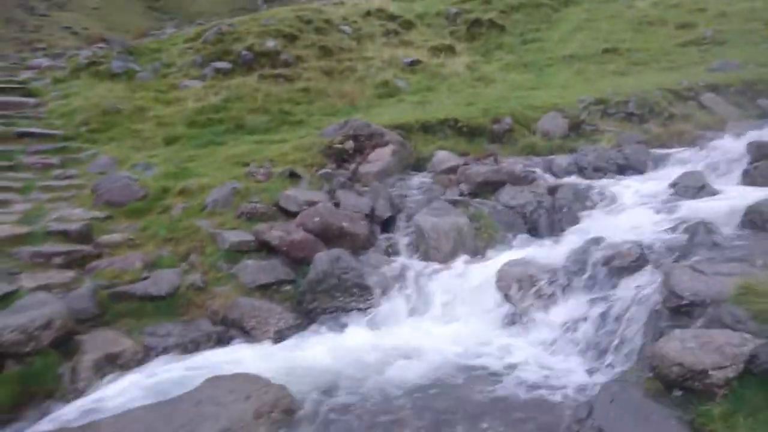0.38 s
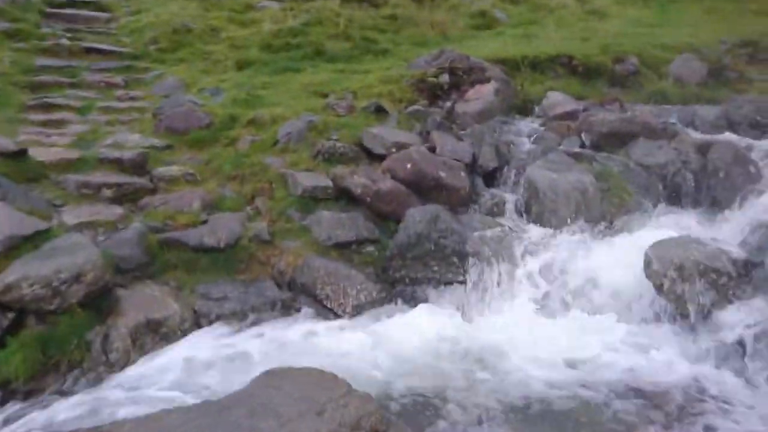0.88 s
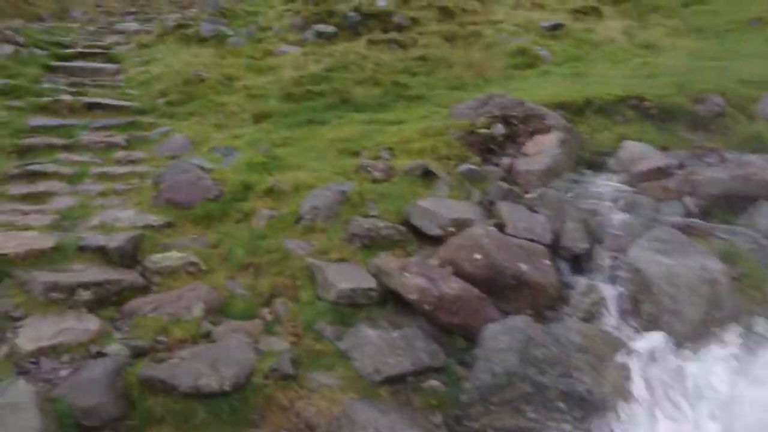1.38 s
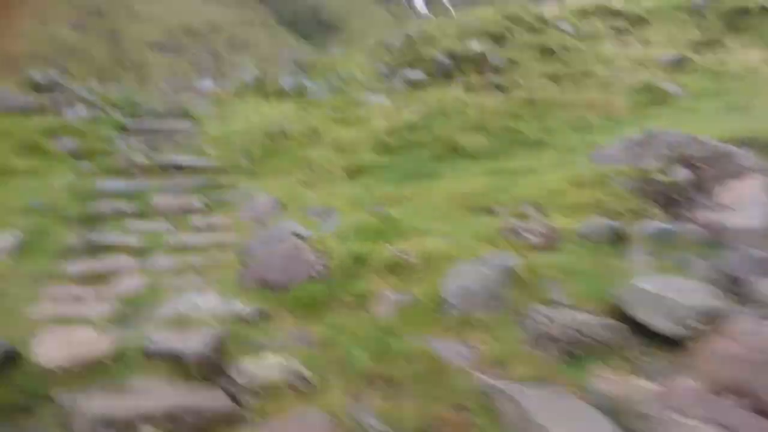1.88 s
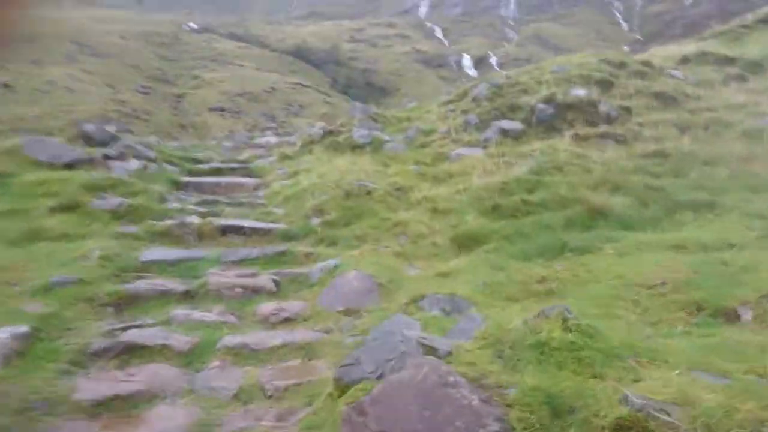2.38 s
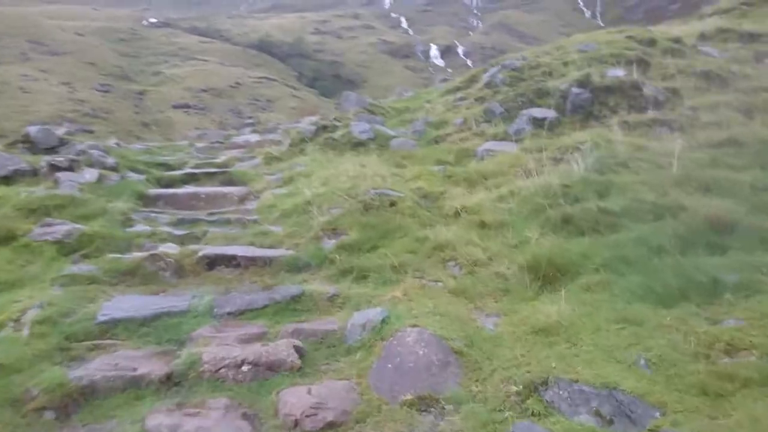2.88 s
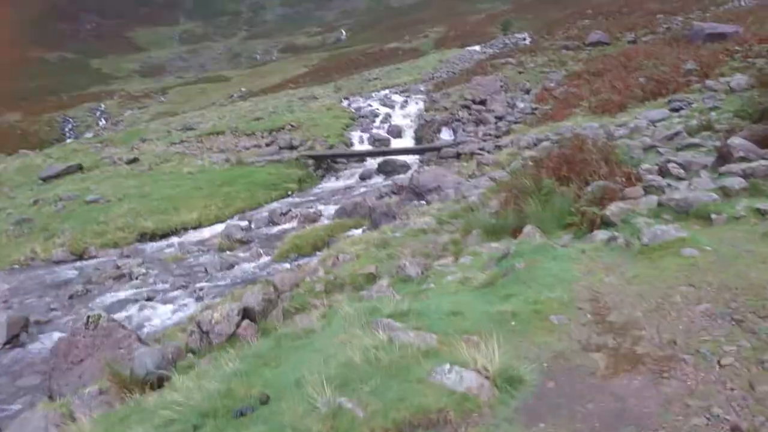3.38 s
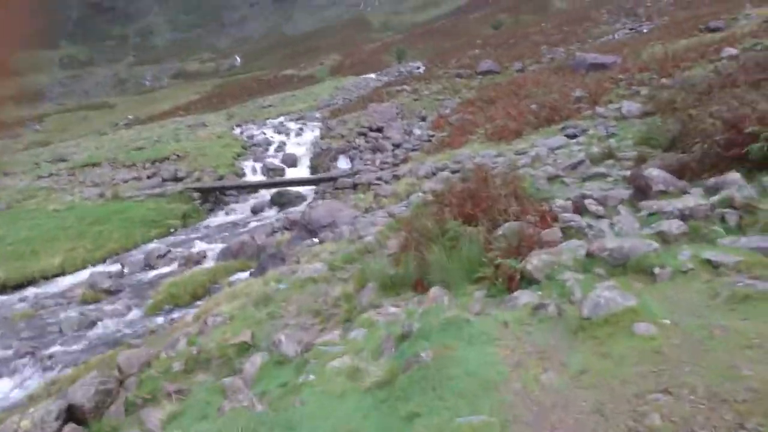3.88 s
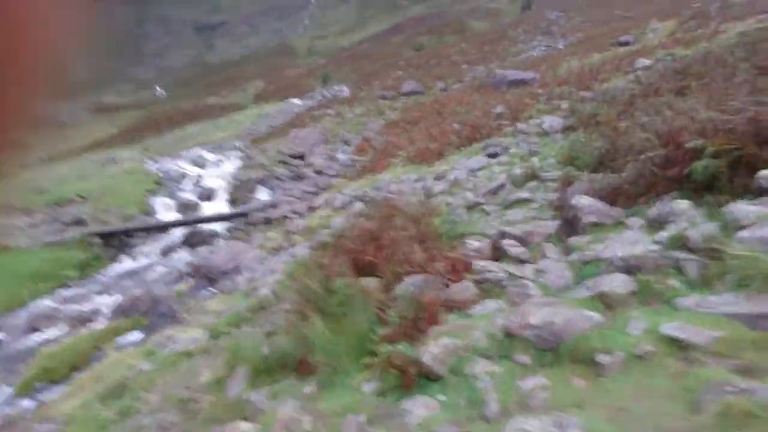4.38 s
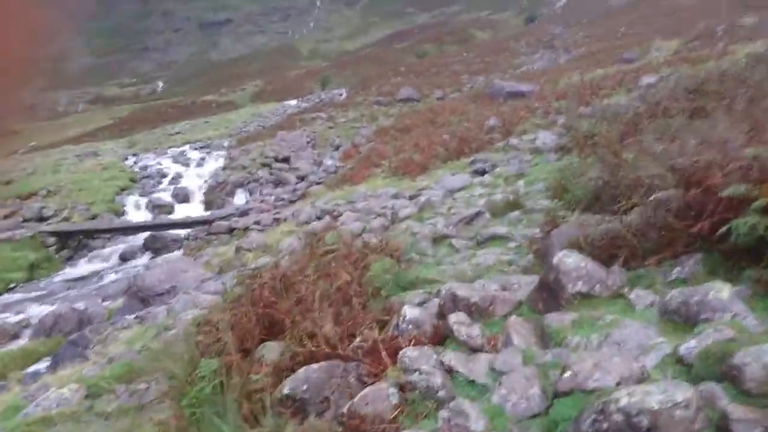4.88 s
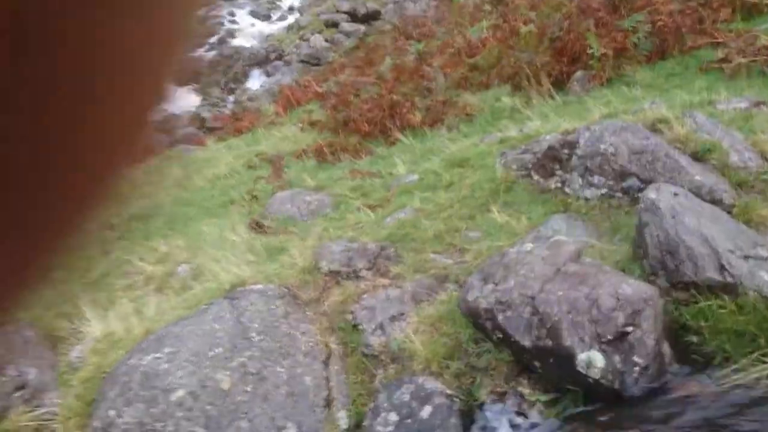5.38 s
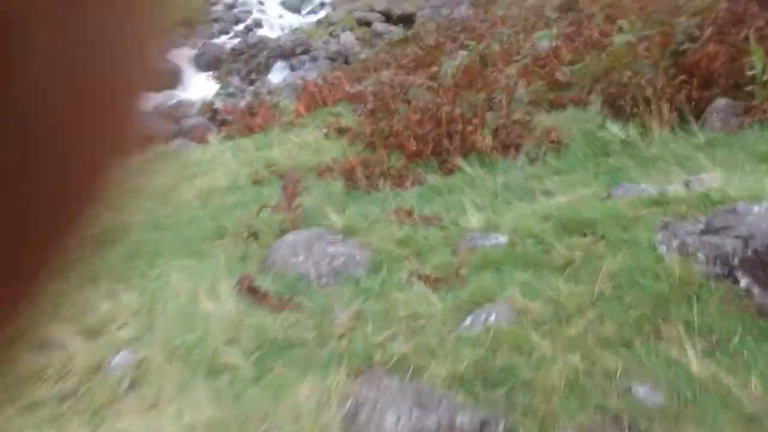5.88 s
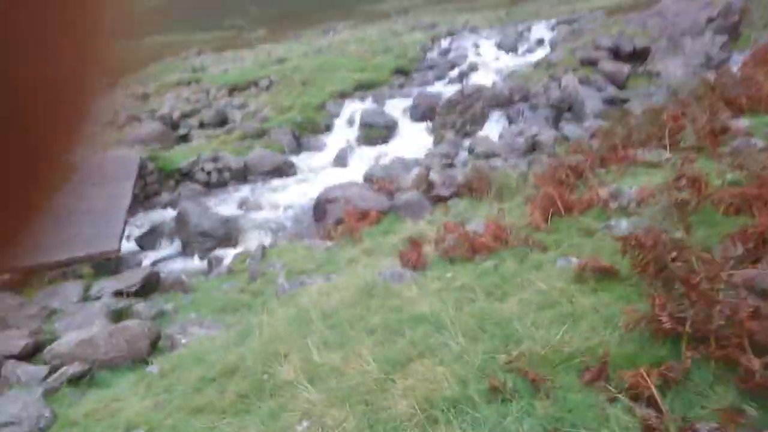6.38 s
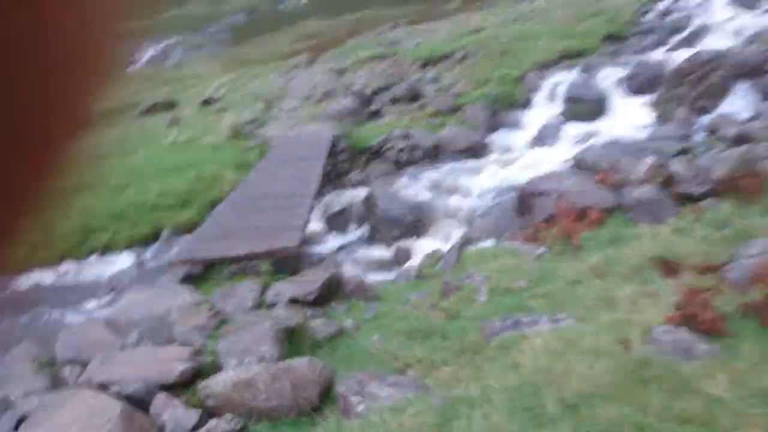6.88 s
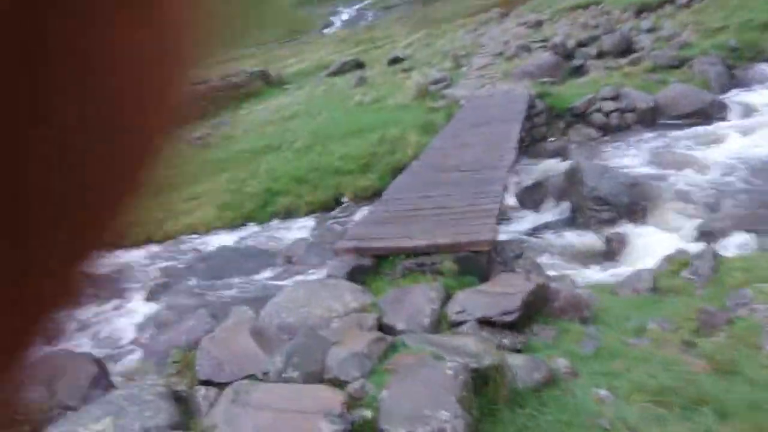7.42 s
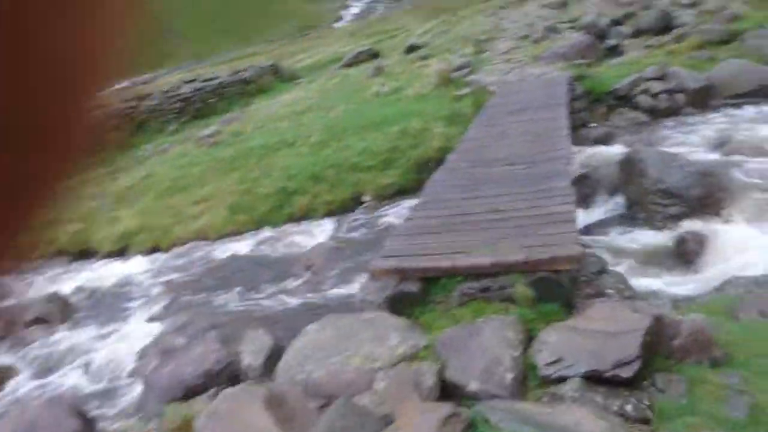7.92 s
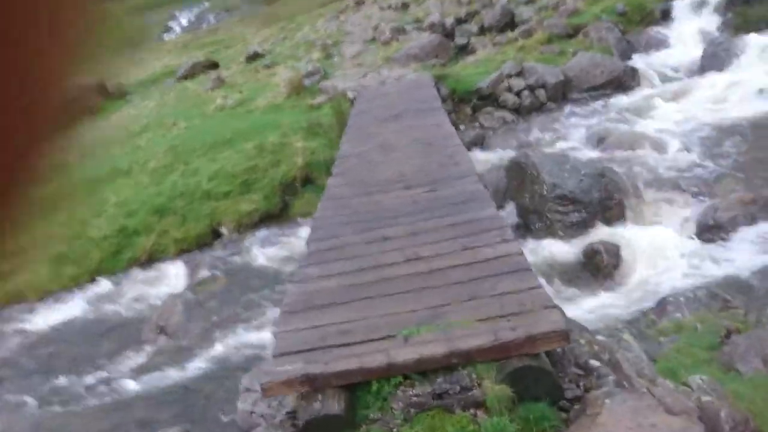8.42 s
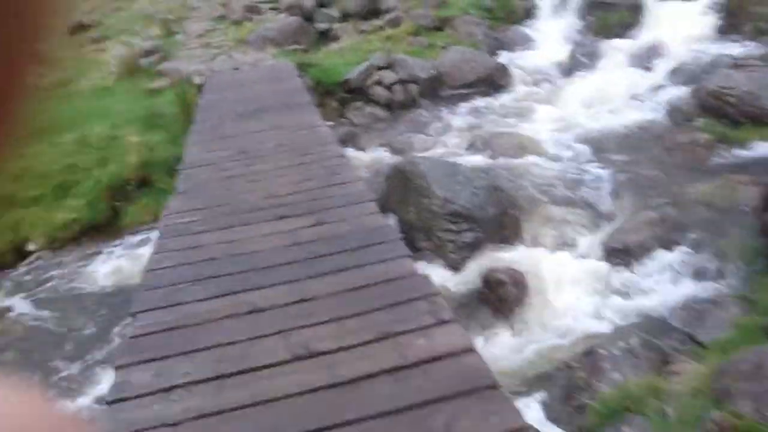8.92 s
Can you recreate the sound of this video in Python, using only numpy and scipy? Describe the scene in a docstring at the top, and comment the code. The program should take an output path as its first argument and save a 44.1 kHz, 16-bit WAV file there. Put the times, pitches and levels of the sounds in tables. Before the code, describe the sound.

Three joined stretches of a rocky hillside stream: first close and bright, then after a short silence clearly quieter, finally stronger and fuller. Low, soft wind thumps and occasional dry ticks hit the handheld microphone. Tiny spray hisses flick on the right, while a partly covered left side sounds dull.

```python
"""Beside a rocky stream: fast water tumbles past, heard from three spots in turn, with quick fades between. The
water is patchy noise and rising bubble rings, split into four bands that swell over time. Wind on the hand-held
microphone is lumpy low noise, with pops as short falling rings; sharp ticks come from knocks on the body of the
recorder. The left port is partly covered: it hears the water muffled, through a small cavity, while the low
pops reach both ports. Short bursts of narrow noise make hisses of spray."""
import sys
import numpy as np
from scipy import signal
from scipy.fft import rfft, irfft, next_fast_len
from scipy.io import wavfile
from scipy.ndimage import uniform_filter1d, map_coordinates

SR = 44100
rng = np.random.default_rng(int(sys.argv[2]) if len(sys.argv) > 2 else 0)


def makeup_ratio(level_db):
    """Linear amplitude ratio for a level in decibels (20 dB per factor of ten)."""
    decades = np.asarray(level_db, float) / 20
    return 10 ** decades


def pcm_store(signal):
    """Save signal as 16-bit PCM."""
    levels = np.round(np.clip(np.atleast_2d(signal), -1, 1) * 32767)
    wavfile.write(sys.argv[1], SR, levels.astype(np.int16).T)


N = 398218  # length in samples


def unit(x):
    """Scale so that the mean of the channels has rms 1."""
    return x / np.sqrt(np.mean(np.atleast_2d(x).mean(axis=0) ** 2) + 1e-20)


def along(points, hz):
    """Read each column after the Hz, on a log frequency axis."""
    point_hz, *columns = np.transpose(points)
    return [np.interp(np.log(hz + 1), np.log(point_hz + 1), column) for column in columns]


def curves(rows, t):
    """Read each column after the time, at times t."""
    row_s, *columns = np.transpose(rows)
    return [np.interp(t, row_s, column) for column in columns]


def wobble(size, rate):
    """A smooth random curve, with rate knots a second."""
    knots = rng.standard_normal(int(size * rate / SR) + 4)
    return map_coordinates(knots, [np.arange(size) * rate / SR])


def filtered(x, response):
    """Multiply the spectrum of x by a response, which may be complex."""
    size = x.shape[-1]
    padded = next_fast_len(size + 8192)
    spectrum = rfft(x, padded) * response(np.fft.rfftfreq(padded, 1 / SR))
    return irfft(spectrum, padded)[..., :size]


def ports(heard, stray, cover):
    """Right hears the sound; left hears it reshaped and phase-shifted, mixed with sound of its own."""
    def left_response(hz):
        db, alike, lag = along(cover, hz)
        alike = np.clip(alike, 0, 1)
        shared = alike * np.exp(-1j * lag)
        own = np.sqrt(1 - alike ** 2)
        return makeup_ratio(db) * np.array([shared, own])
    left = filtered(np.array([heard, stray]), left_response).sum(axis=0)
    return np.array([left, heard])


# Colour of the wind's rumble. Each row: frequency in Hz, relative strength in dB.
RUMBLE_COLOUR = [(13, -49), (22, -23.5), (52, -9.5), (70, 5.5), (190, -3), (257, -8.5), (300, -8),
                 (390, -19.5), (660, -120)]
# Strength of the wind, one list for each spot. Each row: time in seconds, level in dB.
WIND_LEVELS = [
    [(.03, -35), (.48, -39.5), (.81, -31), (1.2, -38), (1.58, -34), (1.8, -37), (2.5, -34.5), (2.8, -39),
     (3.2, -34)],
    [(4.2, -46.5), (4.52, -40), (4.65, -43), (5.0, -38)],
    [(5.3, -27.5), (5.44, -30), (5.56, -39), (5.94, -34.5), (6.1, -37), (6.5, -34.5), (6.96, -39.5),
     (7.3, -32), (7.65, -39), (7.81, -35), (8.28, -38.5), (8.8, -33), (9.0, -37.5)],
]


def wind(place, t):
    """Lumpy gusts rumble on the microphone: low noise that reaches both ports much alike."""
    size = len(t)
    eddies = makeup_ratio(2.1 * wobble(size, rate=18)) * rng.standard_normal((2, size))
    rumble = filtered(eddies, lambda hz: makeup_ratio(along(RUMBLE_COLOUR, hz)[0]))
    # each row: Hz, left against right in dB, likeness 0-1, lag in radians
    both = ports(*rumble, [(60, -5.0, 0.9, .01), (250, -8.0, 0.78, 0.24)])
    return makeup_ratio(curves(WIND_LEVELS[place], t)[0]) * unit(both)


def pop(hz, length, t):
    """A pressure jolt: the capsule rings a few cycles, falling in pitch towards hz."""
    turns = hz * (t + .0035 * (1 - np.exp(-t / .004)))
    onset = 1 - np.exp(-(t / .002) ** 2)
    return -np.sin(2 * np.pi * turns) * onset * np.exp(-(t / length) ** 2)


# Wind pops on the capsule. Each row: start in seconds, strength in dB before onset, decay and port gains,
# the pitch in Hz that the ring falls to, length in seconds.
WIND_POPS = [(0.1014, -19, 81, 0.021), (0.4537, -10.5, 94.5, .018), (0.7041, -20, 92, .017),
             (0.929, -16, 103, .021), (1.178, -8, 96, .017), (1.41, -22, 78, .028),
             (1.506, -12.5, 86.6, .012), (1.988, -22, 73, 0.028), (2.3113, -18.5, 98, .011),
             (2.427, -15, 84, 0.02), (3.1009, -12, 90, 0.024), (3.323, -18, 83, 0.011),
             (3.3395, -21.5, 92, 0.0091), (4.272, -12, 117, .004), (4.4751, -12.5, 150, 0.0048),
             (4.4835, -16, 150, 0.0063), (4.491, -18, 121, 0.009), (4.508, -11.5, 99, .014),
             (4.99, -12, 116, 0.0085), (5.006, -15, 95, 0.022), (5.1005, -24, 88, .024),
             (5.2864, -13, 102, .014), (5.327, -22, 73, .024), (5.363, -20, 104, 0.022),
             (5.9635, -16, 95.5, .027), (6.029, -15.5, 87.5, .019), (6.055, -15.5, 86, 0.014),
             (6.324, -15, 88, .025), (6.621, -22, 92, .032), (6.763, -21, 157, 0.025),
             (6.773, -13, 76.5, 0.022), (6.9683, -22.5, 86, 0.04), (7.1066, -15.5, 107, 0.013),
             (7.645, -17, 72, .03), (8.021, -19, 95, .01)]
# Sharp ticks in the body of the recorder, perhaps a finger shifting.
# Each row: start in seconds, peak in dB before the port gains, pitch in Hz, decay in seconds.
CASE_TICKS = [(0.451, -17, 350, 0.0022), (1.178, -20, 350, .002), (4.229, -27.5, 688, .0015),
              (4.274, -27, 600, .001), (4.477, -18, 610, 0.0017), (4.484, -22, 600, .002),
              (4.492, -20, 605, .002), (4.508, -23, 450, .0015), (4.984, -22, 500, .003),
              (5.966, -10, 600, 0.0014), (6.764, -25, 400, .002), (7.638, -22, 1050, .0012),
              (7.658, -19.5, 432, 0.0091)]


def pops():
    """Single gusts jolt both ports together; ticks travel through the case to both."""
    out, t = np.zeros(N + SR), np.arange(SR // 10) / SR
    for start, db, hz, length in WIND_POPS:
        out[round(start * SR):][:len(t)] += makeup_ratio(db) * pop(hz, length, t)
    for start, db, hz, decay in CASE_TICKS:
        ring = np.sin(2 * np.pi * hz * t) + 0.14 * np.sin(2 * np.pi * 3.2 * hz * t)
        tick = ring * np.exp(-t / decay)
        tick = tick * (1 - np.exp(-(t / 0.00047) ** 2))  # rounded start: little above 3 kHz
        out[round(start * SR):][:len(t)] += makeup_ratio(db) * tick / tick.max()
    return out[:N] * makeup_ratio([[-3], [2]])  # left and right gain in dB


# Short hisses of spray. Each row: start in seconds, level at the swell's top in dB, centre in Hz,
# spread to each side in Hz, rise in seconds.
SPRAY_HISSES = [(.915, -29.5, 9000, 4000, 0.013), (2.667, -29, 9800, 1000, 0.0037),
                (2.676, -32, 9000, 800, 0.0044), (3.003, -36, 9550, 1300, 0.0083),
                (4.243, -43, 11000, 1500, .006), (4.752, -44, 11500, 1200, 0.0067),
                (5.175, -32, 4900, 800, 0.0024), (8.265, -40, 9700, 1200, 0.013)]


def spray():
    """Brief narrow noise that swells and dies away, almost only at the open right port."""
    out, t = np.zeros(N + SR), np.arange(SR // 10) / SR
    for start, db, centre_hz, width_hz, rise in SPRAY_HISSES:
        noise = rng.standard_normal(len(t))
        hiss = filtered(noise, lambda hz: np.exp(-((hz - centre_hz) / width_hz) ** 2))
        swell = (t / rise) * np.exp(1 - t / rise)
        out[round(start * SR):][:len(t)] += makeup_ratio(db) * unit(hiss) * swell
    return out[:N] * makeup_ratio([[-45], [0]])  # left and right gain in dB


def patchy(size, patchy_db):
    """Churning water: white noise with patches of random gain in time and pitch."""
    cells = signal.stft(rng.standard_normal(size + 512), nperseg=512)[2]
    field = uniform_filter1d(rng.standard_normal(cells.shape), size=2, axis=0)
    field = uniform_filter1d(field, size=7, axis=1)
    cells = cells * makeup_ratio(patchy_db * field / field.std())
    return unit(signal.istft(cells, nperseg=512)[1][:size])


def bubbles(size, rate, cycles, spread_db):
    """Bubbles ring briefly and rise in pitch; small ones are high, so the sum is about white."""
    at, pitch, big = rng.random((int(rate * size / SR), 3)).T[:, :, None]
    hz, t = 550 * 14 ** pitch, np.arange(380) / SR
    turns = hz * t
    ring = np.sin(2 * np.pi * turns * (1 + 0.11 * turns / cycles))
    shape = ring * np.exp(-3 * turns / cycles) * (1 - np.exp(-turns))
    grains = hz * makeup_ratio(-spread_db * np.log(1 - big)) * shape
    where = (at * size).astype(int) + np.arange(len(t))
    return unit(np.bincount(where.ravel(), grains.ravel())[:size])


# The flow, one list for each spot. Each row: time in seconds, level of the water's body in dB,
# fizz over body in dB as the microphone turns, left-right balance of the treble in dB
# (only its change from the spot's average is used).
WATER_FLOW = [
    [(0, -29.5, -11, -22), (.3, -30, -9.5, -20), (.75, -28.5, -10, -20), (1.0, -27, -9, -20),
     (1.3, -29, -7.5, -22.5), (1.8, -29.5, -4.5, -27.5), (2.25, -29.5, -5, -29.5),
     (2.5, -30.5, -5.5, -29.5), (2.75, -32.5, -7, -27.5), (3.34, -34, -9.5, -24.5)],
    [(4.01, -38.5, -8.5, -21), (5.17, -39, -8, -20)],
    [(5.25, -30, -8.5, -19), (5.5, -29.5, -9.5, -20), (5.7, -29, -6.5, -18), (5.95, -31, -4, -23),
     (6.3, -34, -8, -27.5), (6.7, -33, -12, -23), (7.1, -34, -13.5, -20.5), (7.7, -33.5, -13.5, -21),
     (8.3, -32, -13.5, -17.5), (8.8, -30.5, -14.5, -19.5), (9.03, -29, -15, -19)],
]
# Each row is a spot: gurgle over body in dB at average fizz, rush over body in dB when fizz equals body.
BAND_LEVELS = [(-2.5, 4), (-2, 6), (-2.5, 5)]
# Edges in Hz between gurgle, body, rush and fizz.
BAND_EDGES_HZ = (700, 1700, 4500)
# Colour of the water at each spot, before its bands are levelled.
# Each row: frequency in Hz, relative strength in dB.
COLOURS = ([(88, -29.5), (160, -6.5), (300, -1.5), (480, 2.5), (740, -5.5), (1050, -3), (1400, -7),
            (1750, -9), (2900, -5), (3700, -11), (6630, -17), (8540, -21.5), (10200, -19.5), (11900, -31),
            (15600, -33.5)], [(88, -19.5), (150, -2), (253, -6), (353, -0.5), (396, -1.5), (798, -5.5),
                             (879, -8), (1110, -3), (1570, -6), (2230, -11), (3630, -8), (4300, -13),
                             (4900, -17.5), (6020, -21), (10200, -27.5), (11900, -27), (15600, -39.5)], [(88, -35), (160, 0), (420, 4), (657, -6), (988, -3),
                                              (1400, -7.5), (1750, -10.5), (2820, -6.5), (4960, -16.5),
                                              (6510, -17), (8880, -23.5), (10200, -21), (11900, -32.5),
                                              (15600, -39.5)])
# The covered left port against the open one, in two positions of the cover.
# Each row: frequency in Hz, level in dB before the balance shifts, likeness 0-1, lag in radians.
COVER_ONE = [(60, 2, .95, 0), (220, -10.5, .8, 0.95), (330, -20, 0.99, 1.6), (536, -13.5, 0.9, -1),
             (860, -9, 0.7, 0.9), (1170, -6, 0.6, 0.65), (1450, -6.5, 0.3, 0.5), (1800, -18, 0.6, 2),
             (2210, -21, .35, -2), (2900, -42, .2, 16), (4200, -28.5, .1, 7.5), (6000, -26, .05, 10),
             (8000, -32.5, .05, 5.5), (9200, -59, .05, 3), (12500, -45, .05, -1), (15000, -17, .05, 17.5)]
COVER_TWO = [(60, -5.5, .97, -3), (217, -7.5, 0.6, 0.6), (333, -18, 0.61, -1), (550, -23, 0.45, -3),
             (770, -11.5, .55, -2), (1150, -11.5, .75, 0.7), (1700, -12.5, .4, 0), (2190, -22, .3, 7),
             (2790, -21, .4, 1.5), (3300, -51, .1, 2), (4600, -36.5, .1, -5), (5770, -22, .05, 3),
             (9000, -25, .05, 11), (11000, -38, .05, 0), (15000, -46, .05, -2.5)]
COVERS = (COVER_ONE, COVER_TWO, COVER_ONE)


def water(place, t):
    """Churn and bubbles in four bands that swell with the view, muffled at the covered port."""
    size = len(t)
    body_db, bright_db, high_balance_db = curves(WATER_FLOW[place], t)
    gurgle_over_db, rush_over_db = BAND_LEVELS[place]
    # gurgle and rush follow the fizz by 0.15 and 0.7 dB for each dB
    gurgle_db = body_db + gurgle_over_db + 0.15 * (bright_db - bright_db.mean())
    rush_db = body_db + rush_over_db + 0.7 * bright_db
    fizz_db = body_db + bright_db
    # a tighter cover dulls the treble and lifts the cavity: dB below 1.7 kHz for each dB above
    low_balance_db = -0.35 * high_balance_db

    churn = [patchy(size, patchy_db=2.0) + 0.36 * bubbles(size, rate=2500, cycles=9.9, spread_db=0.97)
             for port in ("right", "left's own")]
    coloured = filtered(np.array(churn), lambda hz: makeup_ratio(along(COLOURS[place], hz)[0]))
    stereo = ports(*coloured, COVERS[place])

    def above(edge_hz):
        return filtered(stereo, lambda hz: 1 / (1 + (edge_hz / (hz + 1)) ** 6))

    over_gurgle, over_body, fizz = [above(edge_hz) for edge_hz in BAND_EDGES_HZ]
    gurgle, body, rush = stereo - over_gurgle, over_gurgle - over_body, over_body - fizz

    surge = wobble(size, rate=9.08)  # shared by all bands
    flicker = wobble(size, rate=16)  # the fizz alone
    low = makeup_ratio(body_db + 0.48 * surge) * unit(body)
    low = low + makeup_ratio(gurgle_db + 0.3 * surge) * unit(gurgle)
    high = makeup_ratio(rush_db + 0.3 * surge) * unit(rush)
    high = high + makeup_ratio(fizz_db + 0.22 * surge + 0.35 * flicker) * unit(fizz)

    def shifting(db):  # the cover slides over the left port; the right stays put
        return [makeup_ratio(db - db.mean()), np.ones(size)]

    return low * shifting(low_balance_db) + high * shifting(high_balance_db)


# The listening spots. Each row: from and until, in seconds.
SPOT_TIMES = [(0, 3.34), (4.01, 5.17), (5.25, 9.03)]


def spot(place):
    """Water over the wind's rumble at one spot, with 0.04 s to spare at each end for the fades."""
    from_s, until_s = SPOT_TIMES[place]
    t = np.arange(round((from_s - .04) * SR), round((until_s + .04) * SR)) / SR
    t = t[(t >= 0) & (t < N / SR)]
    out = np.zeros((2, N))
    out[:, round(t[0] * SR):][:, :len(t)] = water(place, t) + wind(place, t)
    return out


def scene():
    """Three spots along the stream, with pops and spray."""
    return sum(spot(place) for place in range(len(SPOT_TIMES))) + pops() + spray()


# Each change of spot. Each row: silent from and silent until, fade-out and fade-in length, all in seconds.
SPOT_FADES = [(3.379, 3.995, .036, .002), (5.211, 5.211, .033, .036)]


def fades(t):
    """The edit fades out of one spot and into the next."""
    gain = np.ones(N)
    for from_s, until_s, out_s, in_s in SPOT_FADES:
        ramp = np.maximum((from_s - t) / out_s, (t - until_s) / in_s)
        gain *= np.clip(ramp, 0, 1) ** 2  # square of the time from silence
    return gain


def top_cut(x):
    """Nothing passes above the cut-off."""
    return signal.sosfilt(signal.butter(12, 15780, fs=SR, output="sos"), x)


def record(dry):
    """Cut everything from 15780 Hz up, then apply the fades of the edit."""
    limited = filtered(dry, lambda hz: hz < 15780)
    faded = limited * fades(np.arange(N) / SR)
    return top_cut(faded)


dry = scene()
out = record(dry)
pcm_store(out)
```